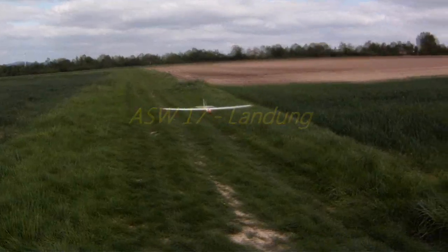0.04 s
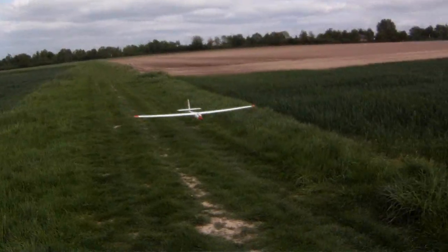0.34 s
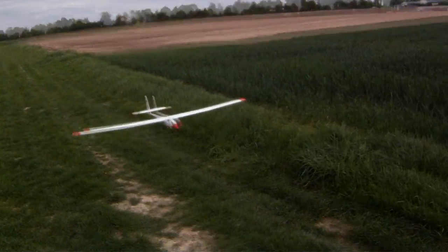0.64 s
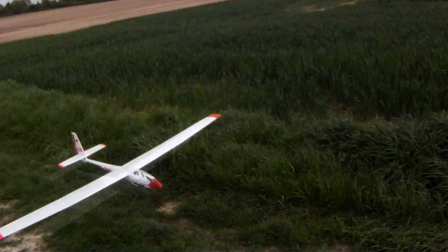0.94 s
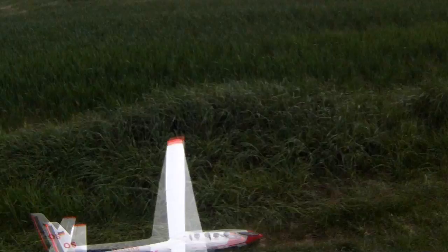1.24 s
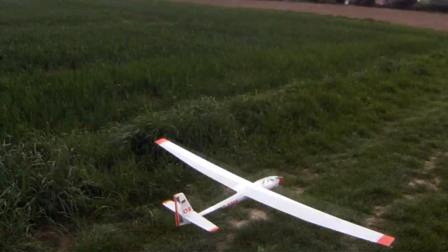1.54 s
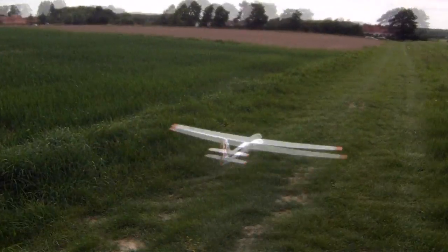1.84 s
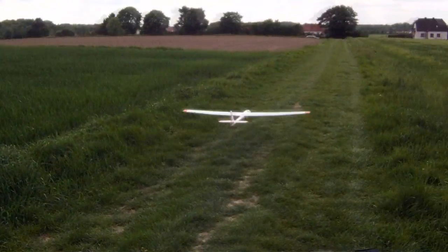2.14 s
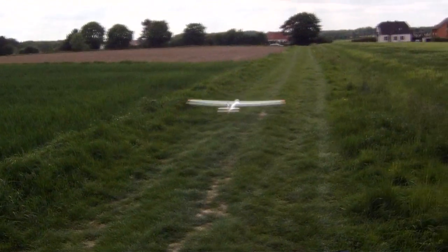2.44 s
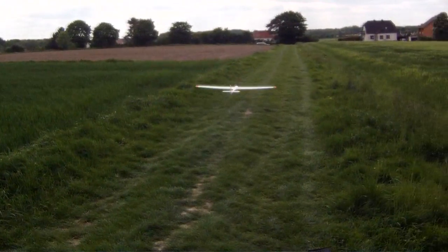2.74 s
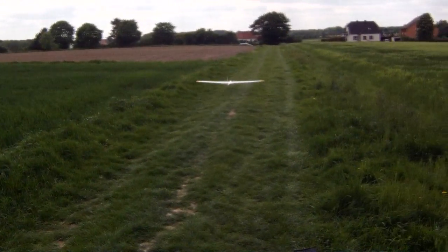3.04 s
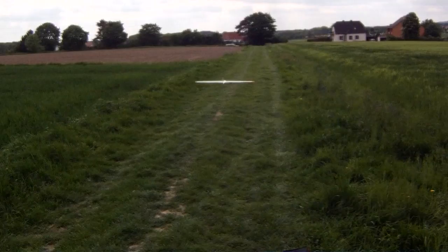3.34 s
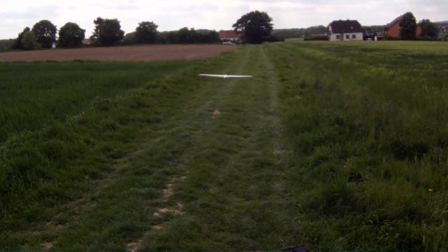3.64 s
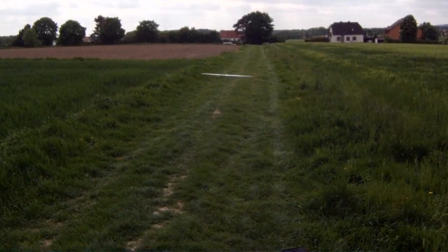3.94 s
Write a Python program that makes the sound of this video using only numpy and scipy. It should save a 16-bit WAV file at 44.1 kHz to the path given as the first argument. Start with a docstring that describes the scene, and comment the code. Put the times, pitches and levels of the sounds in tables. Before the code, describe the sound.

Low wind rumble in a field, gusting hard as a model glider whooshes close by.

```python
"""A model glider swishes low through a windy field, and its turbulent wake buffets the microphone.
Gusts rumble throughout over the rush of the field and a faint whistle of air. A far engine hums and
slowly rises above an unsteady drone, and short rustles follow the pass. The recorder holds each of
only 1500 samples a second, and the resulting spectral images lay a gritty buzz over everything."""
import sys
import numpy as np
from scipy import signal
from scipy.fft import rfft, irfft
from scipy.io import wavfile
from scipy.ndimage import uniform_filter1d

SR = 44100
rng = np.random.default_rng(int(sys.argv[2]) if len(sys.argv) > 2 else 0)


def file_out(sig):
    """Save sig as 16-bit WAV at sys.argv[1]."""
    # one column per channel
    cols = np.atleast_2d(sig).T
    # limit, then scale
    lim = np.clip(cols, -1, 1)
    pcm = np.round(lim * 32767).astype(np.int16)
    wavfile.write(sys.argv[1], SR, pcm)


N = 176400
T = np.arange(N) / SR

# gust strength at the microphone: time_s, level_db
GUST_LEVELS = [(0, -53.5), (.9, -53.5), (.98, -54), (1.03, -50.5), (1.1, -48), (1.18, -44.5), (1.23, -51),
               (1.55, -57), (1.6, -49.5), (1.66, -56), (1.71, -51.5), (1.82, -55.5), (2.25, -56),
               (2.28, -50), (2.35, -46.5), (2.4, -58), (2.45, -48.5), (2.5, -56), (3.3, -55), (3.46, -50.5),
               (3.64, -55), (3.71, -56.5), (3.76, -46.5), (3.83, -57), (4, -53)]
# spectral shapes of the noise sources: frequency_hz, relative_density_db
RUMBLE_SPECTRUM = [(3, -17), (15, -6.5), (35, 0), (55, 1.5), (80, -4.5), (108, -8), (150, -14),
                   (250, -28.5), (700, -45)]
FIELD_SPECTRUM = [(20, -9), (120, 0.5), (190, -1), (250, 2), (350, -3.5), (440, 1), (500, -3.5),
                  (570, -2.5), (650, -4), (750, -14.5)]
AIRFLOW_SPECTRUM = [(30, -1.5), (120, -13.5), (250, -2.5), (350, 4), (450, -0.5), (540, 0.5), (610, -12),
                    (750, -14)]
WAKE_SPECTRUM = [(5, -24), (20, -6), (40, 8.5), (65, -2.5), (90, 2), (150, -4.5), (215, -12), (270, -19),
                 (700, -43)]
RUSTLE_SPECTRUM = [(50, -24), (200, -12), (300, 4.5), (400, 5), (460, -2), (530, 10.5), (600, 5), (680, 0),
                   (750, -14.5)]
CHANNEL_NOISE_SPECTRUM = [(20, -37), (100, -25), (250, 2), (550, 5), (900, -7), (2000, -23.5),
                          (5000, -30.5), (15000, -32)]
# fundamental of the far engine: time_s, pitch_hz
ENGINE_PITCH = [(0, 94), (1, 92), (1.6, 94.5), (2.3, 98), (3.1, 101.5), (4, 106)]
# course of the low drone: time_s, pitch_hz, level_db
DRONE_COURSE = [(0, 59.86, -63), (1.5, 60.2, -64), (2.1, 57.07, -64), (2.6, 58, -64.5), (2.95, 61.6, -62.5),
                (3.3, 52, -56.5), (4, 50, -59.5)]
# wake eddies striking the microphone: centre_s, half_width_s, level_db
WAKE_BUFFETS = [(1.268, 0.041, -46.5), (1.349, 0.024, -37.5), (1.419, 0.039, -39.5), (1.515, 0.012, -49)]
# nearby scuffs: start_s, length_s, level_db
RUSTLE_EVENTS = [(2.093, 0.012, -56), (2.12, 0.038, -54.5), (2.175, 0.035, -59.5), (2.521, 0.018, -61.5),
                 (3.035, 0.086, -63), (3.377, 0.01, -53), (3.405, 0.044, -50.5), (3.468, 0.0088, -53.5),
                 (3.5, 0.035, -60), (3.536, .052, -53.5), (3.611, 0.02, -58), (3.633, 0.081, -62),
                 (3.73, 0.022, -57), (3.77, 0.0088, -55), (3.869, 0.017, -61), (3.893, 0.0076, -49.5)]
# frequency response of the recorder: frequency_hz, gain_db
RECORDER_RESPONSE = [(100, 0), (700, 0), (2000, 0), (5000, -0.5), (10000, -2), (15000, -5.5)]

BIN_HZ = np.fft.rfftfreq(N, 1 / SR)
HOLD_HZ, INPUT_EDGE_HZ, OUTPUT_EDGE_HZ = 1500, 708.6, 15350
HISS_DB, CHANNEL_NOISE_DB = -88, -87.5


def amp(db):
    """Amplitude ratio of a level in decibels."""
    return 10 ** (np.asarray(db) / 20)


def unit(x):
    """Normalisation to rms 1."""
    return x / np.sqrt(np.mean(x ** 2) + 1e-20)


def curve(rows, column=1):
    """Linear interpolation of one column of a time table at every sample."""
    rows = np.array(rows)
    return np.interp(T, rows[:, 0], rows[:, column])


def coloured(x, response):
    """Zero-phase filtering by a gain curve interpolated over log frequency."""
    hz, db = np.transpose(response)
    gain = amp(np.interp(np.log(BIN_HZ + 1), np.log(hz + 1), db))
    return irfft(rfft(x) * gain, N)


def noise(spectrum):
    """Spectrally shaped Gaussian noise of rms 1."""
    return unit(coloured(rng.standard_normal(N), spectrum))


def wander(rate_hz):
    """Random fluctuation: low-passed noise of rms 1."""
    low_pass = np.exp(-(BIN_HZ / rate_hz) ** 2)
    return unit(irfft(rfft(rng.standard_normal(N)) * low_pass, N))


def eddies(spectrum, window_samples):
    """Turbulence of even strength: noise divided by its running rms."""
    x = noise(spectrum)
    running_power = abs(uniform_filter1d(x ** 2, window_samples))
    return x / np.sqrt(running_power + 1e-9)


def wind(field_db=-61, swell_db=1.06):
    """Turbulent pressure on the microphone rumbles in gusts over the soft rush of the field."""
    rumble = amp(curve(GUST_LEVELS)) * eddies(RUMBLE_SPECTRUM, window_samples=4400)
    rush = amp(field_db + swell_db * wander(rate_hz=6.3)) * noise(FIELD_SPECTRUM)
    return rumble + rush


def whistle(pitch_hz=502, drift_hz=20, width_hz=14, level_db=-73, swell_db=1.5):
    """Narrow-band air noise is heard as a pitch, here drifting in frequency and strength."""
    phase = 2 * np.pi * np.cumsum(pitch_hz + drift_hz * wander(rate_hz=5.96)) / SR
    band = wander(width_hz) * np.cos(phase) + wander(width_hz) * np.sin(phase)
    return amp(level_db) * unit(band * amp(swell_db * wander(rate_hz=2.6)))


def far_engine(level_db=-58, waver_db=1, octave_db=-17):
    """Periodic vibration gives a slowly rising fundamental and a weak second harmonic."""
    phase = 2 * np.pi * np.cumsum(curve(ENGINE_PITCH)) / SR
    hum = unit(np.sin(phase) + amp(octave_db) * np.sin(2 * phase))
    return amp(level_db + waver_db * wander(rate_hz=5)) * hum


def drone(waver_hz=1.7):
    """Random frequency modulation makes a low sinusoid unsteady."""
    pitch_hz = curve(DRONE_COURSE) + waver_hz * wander(rate_hz=9.3)
    phase = 2 * np.pi * np.cumsum(pitch_hz) / SR
    return amp(curve(DRONE_COURSE, column=2)) * unit(np.sin(phase))


def glider(pass_s=1.406, pass_db=-55.5, nearest_m=2.18, speed_m_per_s=6.64):
    """Spherical spreading: the amplitude of the airflow noise from the wings varies as 1 / distance."""
    distance_m = np.hypot(nearest_m, speed_m_per_s * (T - pass_s))
    return amp(pass_db) * nearest_m / distance_m * noise(AIRFLOW_SPECTRUM)


def wake():
    """Eddies shed by the glider strike the microphone as Gaussian bursts that add in power."""
    power = sum(amp(db) ** 2 * np.exp(-((T - centre_s) / half_width_s) ** 2)
                for centre_s, half_width_s, db in WAKE_BUFFETS)
    return np.sqrt(power) * eddies(WAKE_SPECTRUM, window_samples=2400)


def rustles(attack_s=.005, release_s=.011, grain_db=1.5):
    """Friction noise, as of brushed grass or clothing: short bursts roughened by fast modulation."""
    power = np.zeros(N)
    for start_s, length_s, db in RUSTLE_EVENTS:
        attack = np.clip((T - start_s) / attack_s, 0, 1)
        release = np.exp(-np.maximum(T - start_s - length_s, 0) / release_s)
        power += (amp(db) * attack * release) ** 2
    friction = eddies(RUSTLE_SPECTRUM, window_samples=400)
    grain = amp(grain_db * wander(rate_hz=270))
    return np.sqrt(power) * unit(friction * grain)


def scene():
    """Superposition: all sources add at one microphone, which feeds both channels."""
    pressure = wind() + whistle() + far_engine() + drone() + glider() + wake() + rustles()
    return np.tile(pressure, (2, 1))


def sample_and_hold(x, oversampling=32):
    """A zero-order hold mirrors the spectrum about multiples of the hold rate, heard as buzz."""
    step_centres_s = (np.arange(round(N * HOLD_HZ / SR)) + .5) / HOLD_HZ
    steps = np.interp(step_centres_s, T, x)
    return signal.resample(np.repeat(steps, oversampling), N)


def record(dry):
    """Band-limited mono sampling, plus a faint steady hiss, slightly different in left and right."""
    attenuation = np.sqrt(1 + np.minimum(BIN_HZ / INPUT_EDGE_HZ, 10) ** 46)  # Butterworth, order 23
    dull = irfft(rfft(dry.mean(0)) / attenuation, N)
    held = coloured(sample_and_hold(dull), RECORDER_RESPONSE)
    mono = held + amp(HISS_DB) * rng.standard_normal(N)
    channels = np.array([mono + amp(CHANNEL_NOISE_DB) * noise(CHANNEL_NOISE_SPECTRUM) for _ in dry])
    band_limit = signal.firwin(511, OUTPUT_EDGE_HZ, window=("kaiser", 9), fs=SR)
    return signal.oaconvolve(channels, band_limit[None], "same")


dry = scene()
out = record(dry)
file_out(out)
```